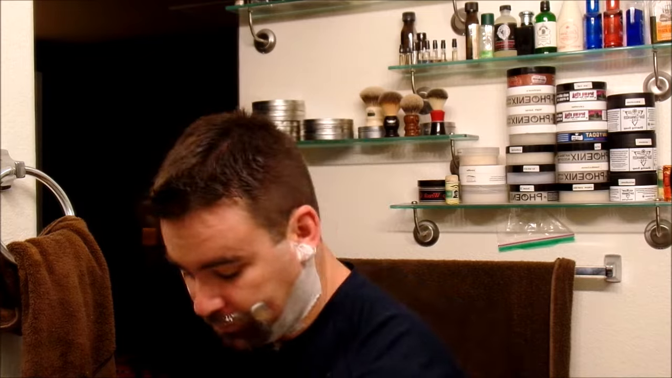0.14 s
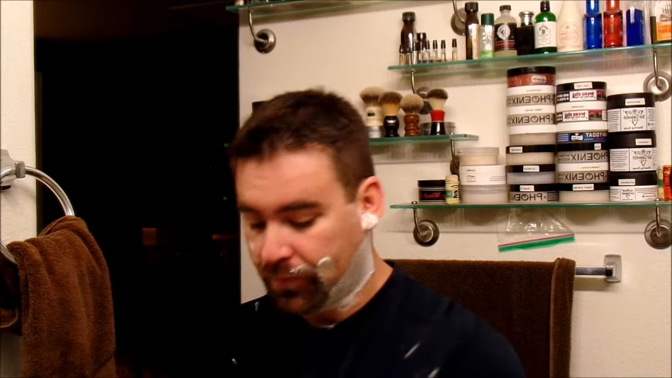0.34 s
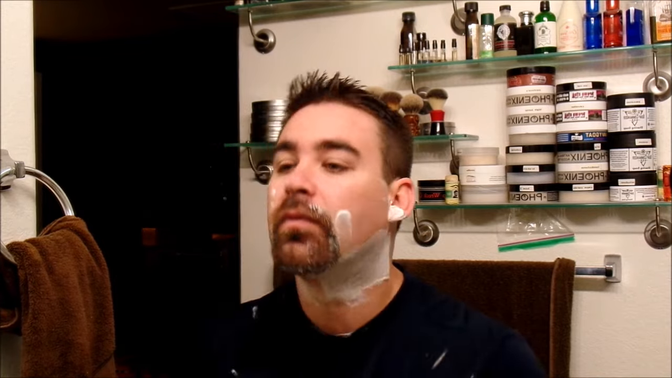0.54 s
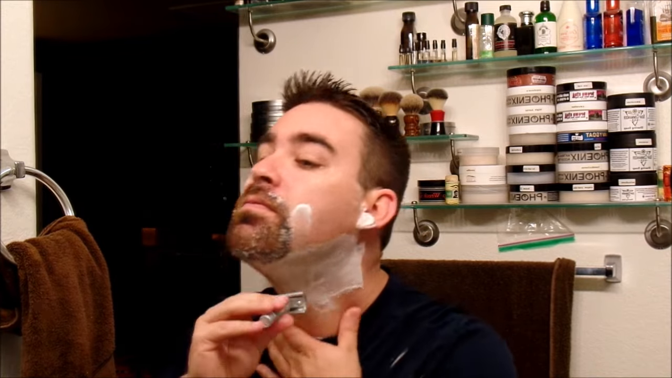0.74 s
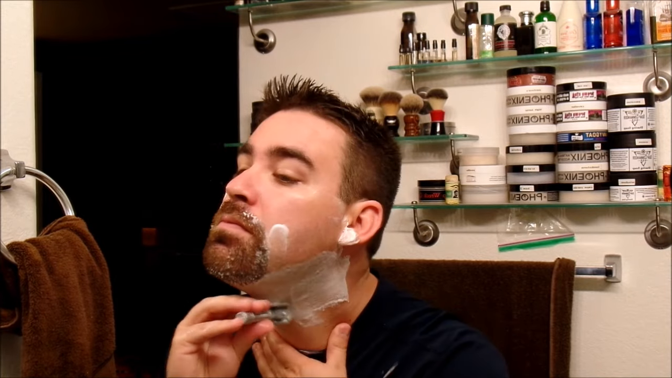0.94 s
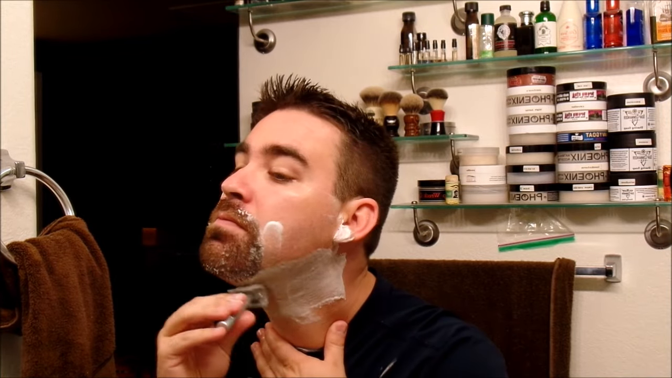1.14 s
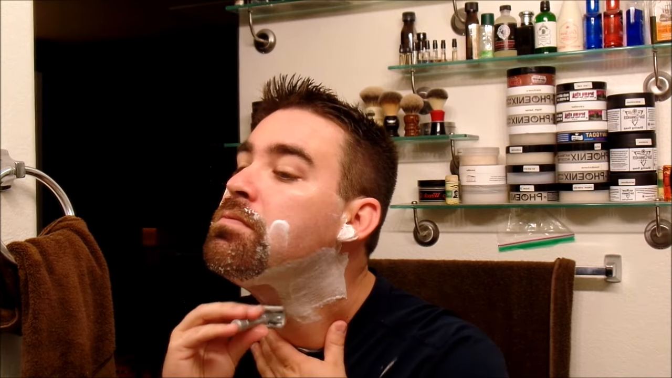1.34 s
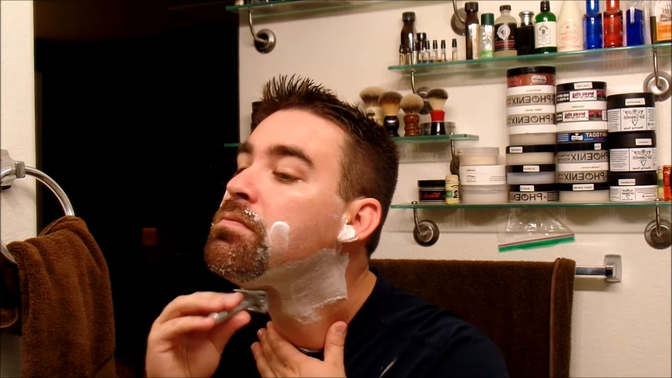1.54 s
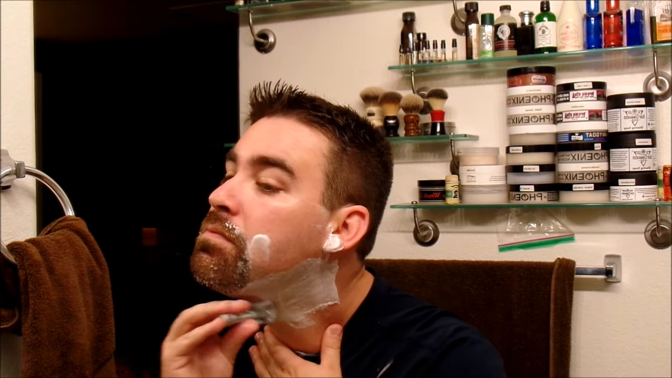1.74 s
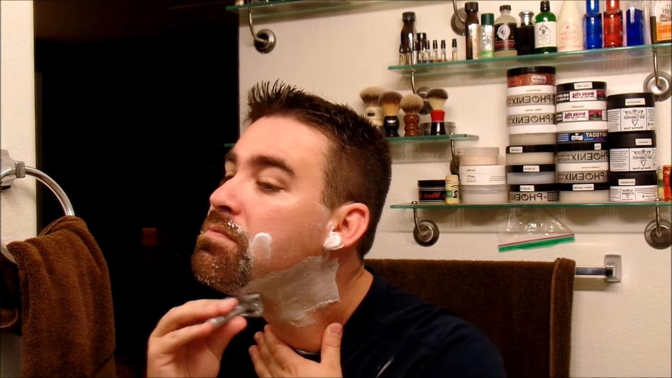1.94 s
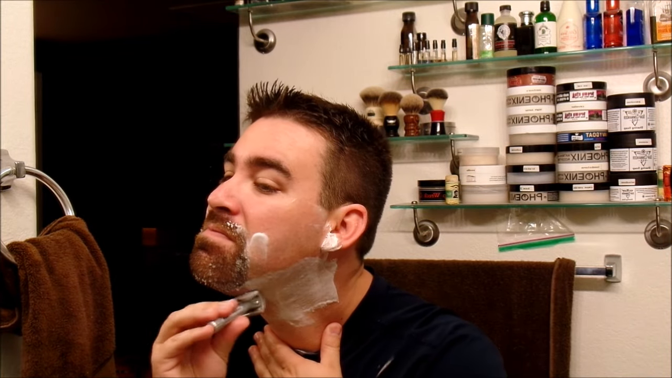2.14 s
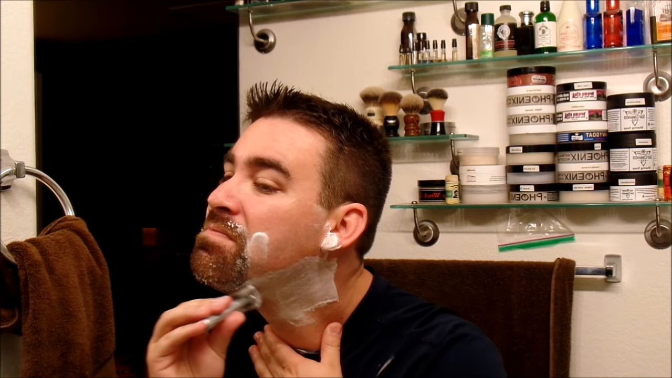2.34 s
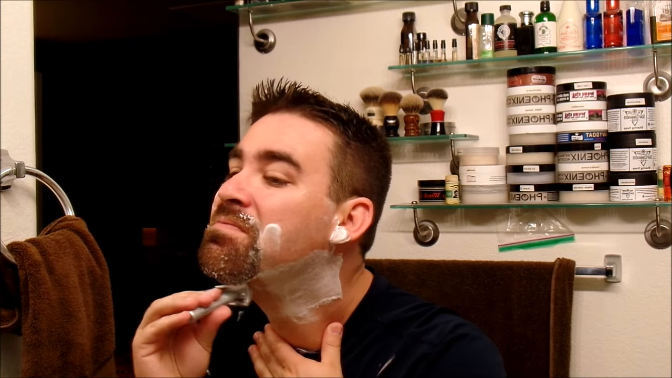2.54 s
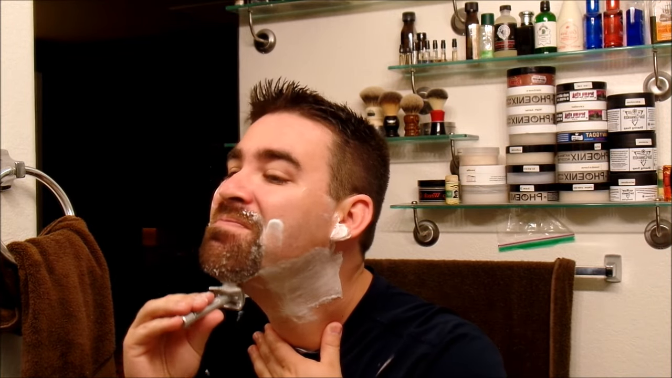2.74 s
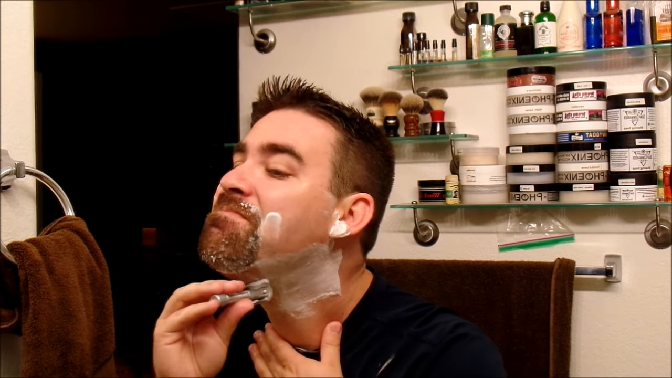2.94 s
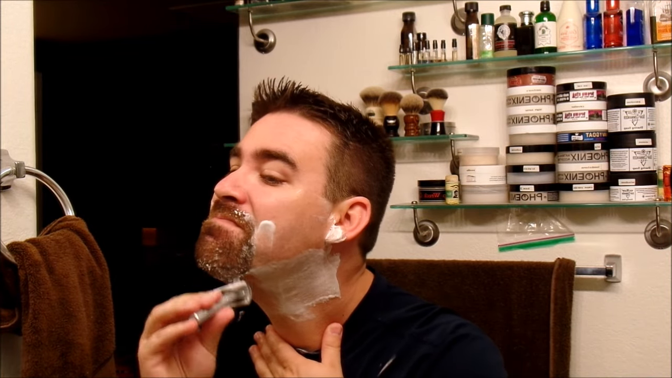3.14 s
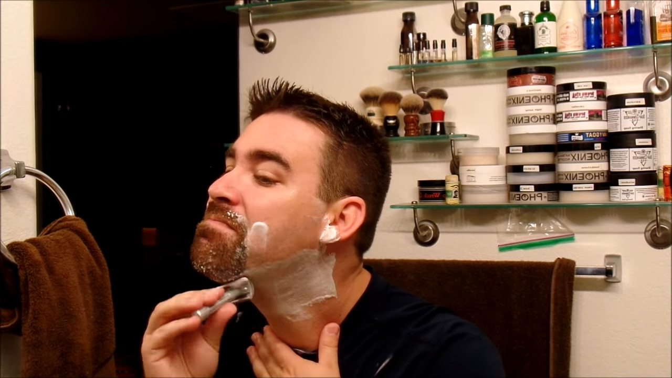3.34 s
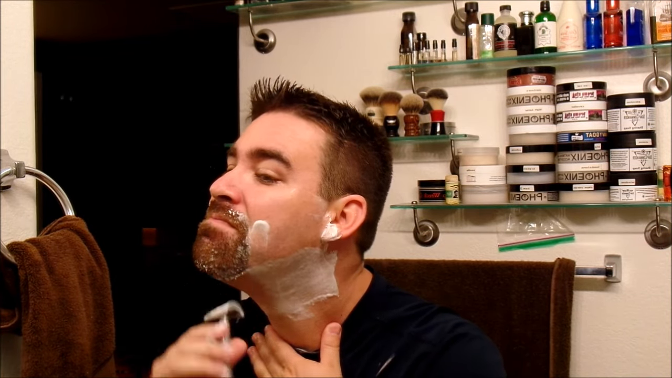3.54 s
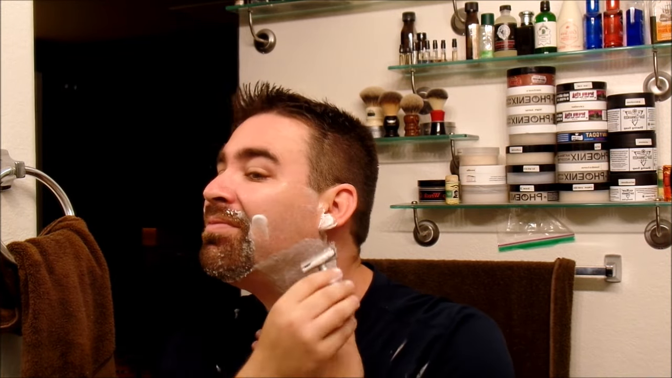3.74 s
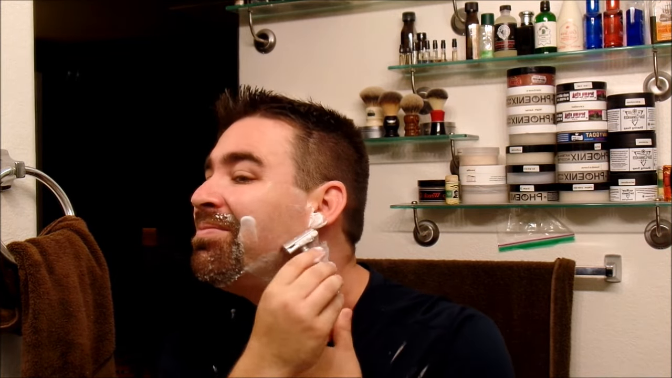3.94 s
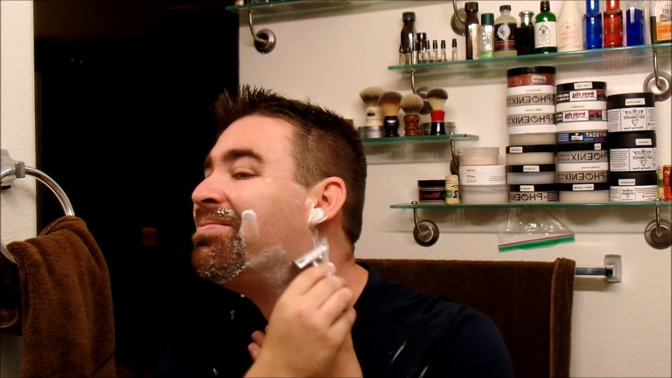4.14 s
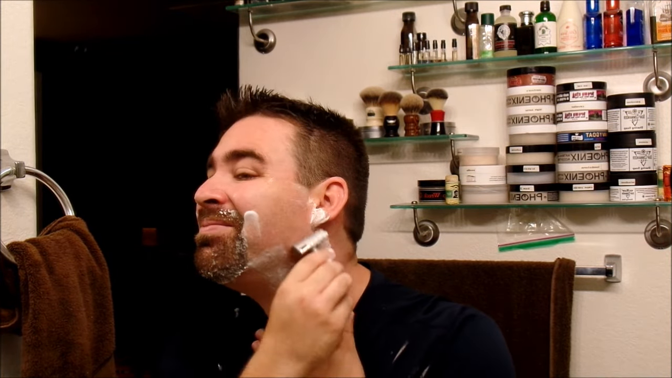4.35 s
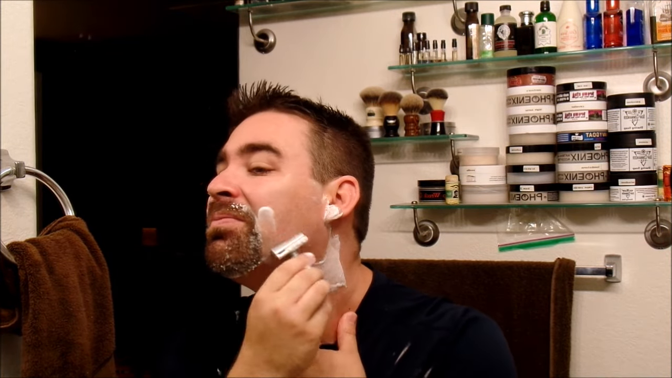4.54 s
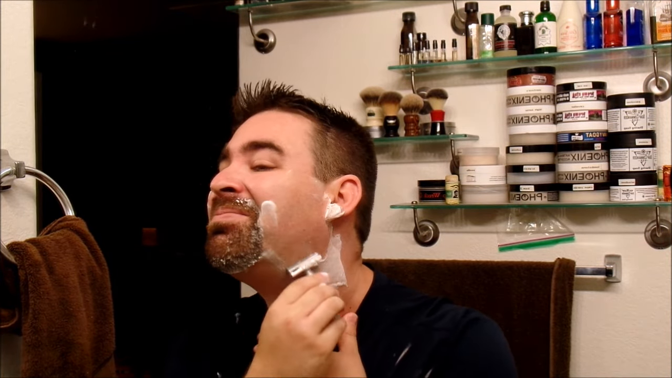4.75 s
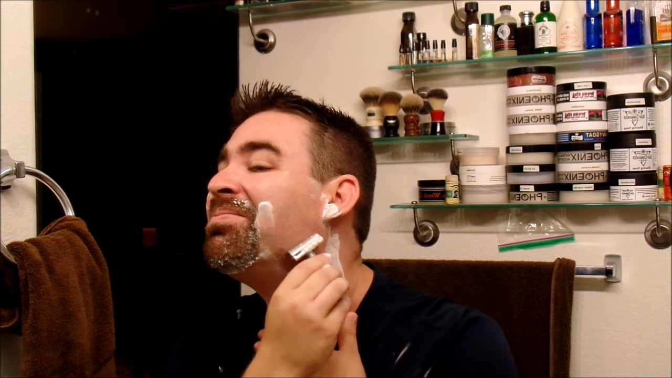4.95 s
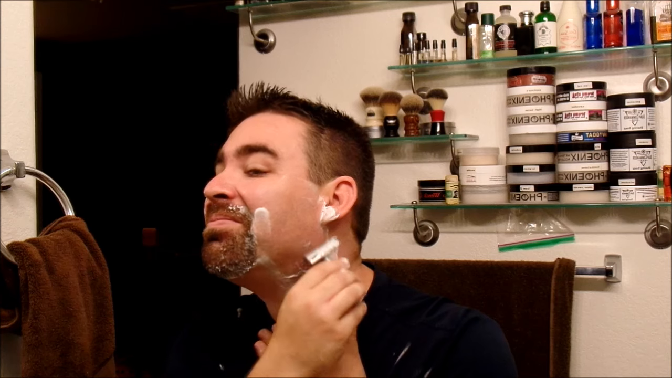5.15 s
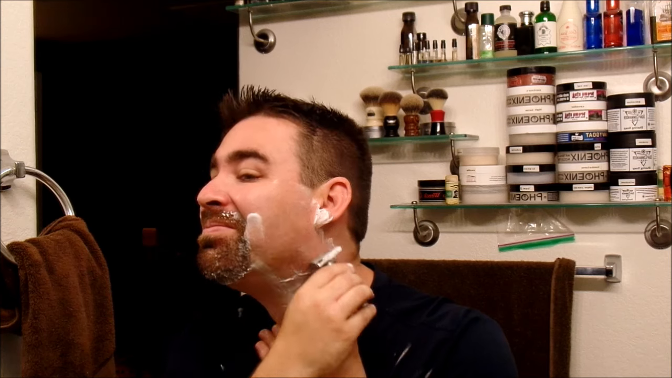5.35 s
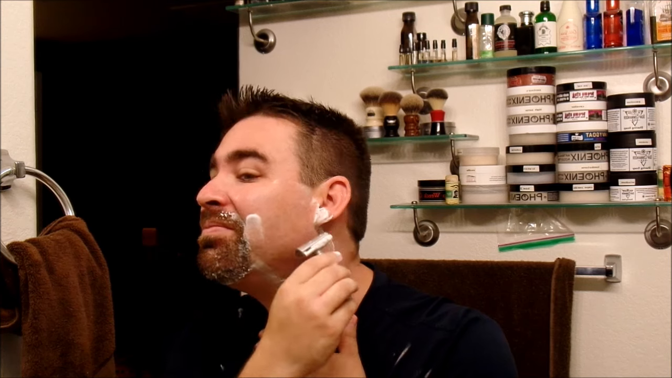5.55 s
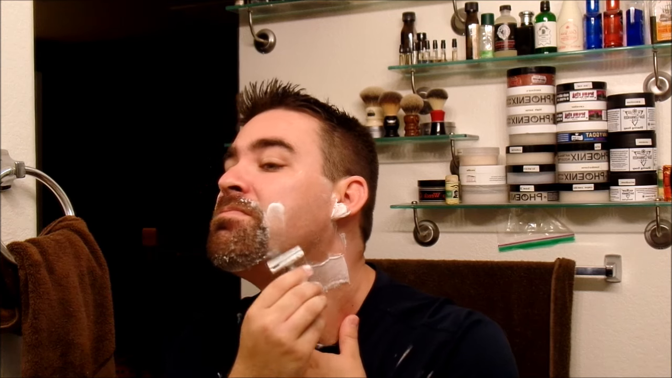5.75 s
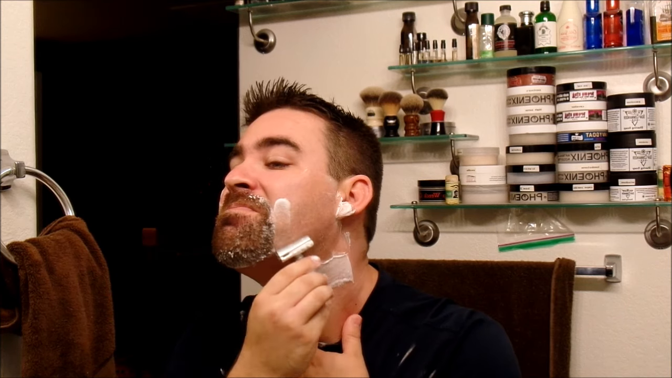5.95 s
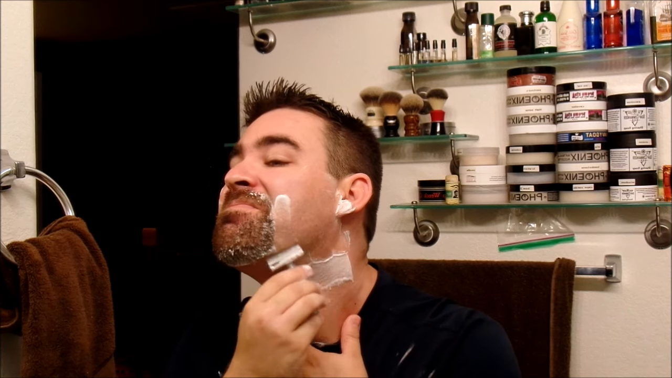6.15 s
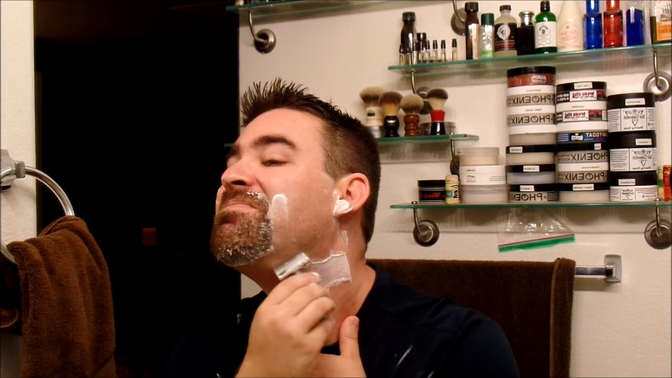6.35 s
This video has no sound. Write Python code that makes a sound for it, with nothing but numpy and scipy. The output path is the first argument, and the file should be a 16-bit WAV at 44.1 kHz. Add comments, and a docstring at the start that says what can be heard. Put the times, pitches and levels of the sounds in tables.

```python
"""A steel safety razor scrapes lathered stubble in short quick strokes: snaps at the blade, rubbing at the guard.
Place: a small bathroom with near, hard walls. Before the strokes the razor is knocked once on the basin, and
scuffs, a tap and clicks follow as it is handled: shaped noise and dying modes. A fan of coloured noise and
wavering tones runs behind. The recorder's expander turns the room down between strokes, so that the hum
swells with each one."""
import sys
import numpy as np
from scipy import signal
from scipy.fft import rfft
from scipy.io import wavfile
from scipy.ndimage import uniform_filter1d

SR = 44100
rng = np.random.default_rng(int(sys.argv[2]) if len(sys.argv) > 2 else 0)


def waveform_to_disk(signal):
    """Save audio, clipped to [-1, 1], as 16-bit WAV at the path in sys.argv[1]."""
    frames = np.transpose(np.atleast_2d(signal))
    scaled = np.clip(frames, -1, 1) * 32767
    samples = np.round(scaled).astype(np.int16)
    wavfile.write(sys.argv[1], SR, samples)


N = 282225
TIME = np.arange(N) / SR   # s

# All levels in the tables are relative: each source adds its own gain.
# razor strokes: fastest motion t/s, length between half-height points/s, blade rasp level/dB
RAZOR_STROKES = [(.586, 0.029, -51.5), (1.095, 0.047, -62.5), (1.225, 0.024, -56.5), (1.354, .035, -59),
                 (1.57, .05, -63.5), (1.877, .034, -53.5), (1.996, .036, -50), (2.102, .032, -48.5),
                 (2.189, .036, -48.5), (2.286, 0.034, -49.5), (2.381, 0.026, -45.5), (2.46, 0.027, -50.5),
                 (2.61, .039, -50.5), (2.722, .026, -47.5), (2.811, 0.017, -51.5), (3.084, 0.05, -50),
                 (3.204, 0.035, -53), (3.421, .037, -53.5), (3.549, 0.046, -51), (4.121, 0.033, -53.5),
                 (4.253, 0.038, -51.5), (4.369, 0.024, -49.5), (4.477, 0.036, -51.5), (4.731, .036, -50),
                 (4.857, 0.034, -48.5), (4.963, 0.041, -56.5), (5.094, 0.042, -47), (5.204, .037, -48.5),
                 (5.335, 0.034, -53.5), (5.436, .02, -56.5), (5.554, 0.04, -56.5), (6.095, 0.083, -59),
                 (6.198, .033, -57.5), (6.302, .036, -61)]
# whiskers snapping at the blade: f/Hz, spectrum level/dB
WHISKER_COLOUR = [(1000, -22), (2500, -5.5), (4000, -11), (6300, -8), (8000, -4.5), (9500, -6),
                  (11000, 1.5), (13000, -9.5), (15800, -3)]
# resonances of the razor head under the blade: f/Hz, width/Hz, level/dB
HEAD_RESONANCES = [(8470, 430, 0), (9260, 320, -1.5), (10040, 350, -4.5), (10700, 260, -13),
                   (12550, 490, 5), (14100, 450, 3.5), (15700, 600, -1)]
# guard rubbing on skin: f/Hz, spectrum level/dB
SKIN_COLOUR = [(40, -7), (120, -16), (220, -1), (600, 2.5), (1100, 3.5), (2000, -7.5), (4000, -8.5),
               (8000, -18), (16000, -36)]
# rub of the guard as the razor works its way over the neck: t/s, level/dB
SKIN_RUB_LEVEL = [(.586, -59), (1.098, -53.5), (2.1, -55), (2.46, -64), (3.085, -57), (3.3, -62),
                  (4.123, -52), (4.368, -50.5), (4.733, -60.5), (5.095, -49.5), (6.095, -64), (6.302, -58)]
# early reflections from mirror and shelves, paths about 0.7 to 2 m longer: delay/s, level/dB
NEAR_REFLECTIONS = [(.0021, -8), (.0037, -15), (.0058, -17)]
# wet scuffs while the razor is handled: t/s, length/s, level/dB, centre of the hiss f/Hz
WET_SCUFFS = [(0.171, .007, -48.5, 11100), (.181, 0.0057, -32.5, 8950), (0.191, .014, -36, 9500),
              (0.199, 0.022, -44, 3780), (.255, .011, -52, 5500), (.297, 0.015, -45, 7340),
              (.321, .011, -53, 10500), (.338, 0.0095, -45, 8850)]
# fine spatter inside the scuffs: f/Hz, spectrum level/dB
SPATTER_COLOUR = [(300, 11.5), (1500, -10.0), (3500, -4.5), (16000, -0.5)]
# clicks of the razor in the fingers: t/s, thin top level/dB, dull body level/dB
FINGER_CLICKS = [(0.458, -37.5, -60), (0.471, -47, -41.5), (0.4917, -41, -60), (0.7121, -41, -50),
                 (0.726, -39.5, -52), (0.825, -39, -49), (0.9643, -42, -63)]
# thin top and dull body of a click: f/Hz, spectrum level/dB
CLICK_TOP_COLOUR = [(3000, -19), (10000, -4.5), (13500, -2), (15500, -7)]
CLICK_BODY_COLOUR = [(800, -15), (2500, 8), (7000, 4), (11000, -26)]
# light tap on the counter: t/s, level/dB
COUNTER_TAP = [(0.349, -36.5)]
# ringing of the tap: f/Hz, level/dB, t60/s
COUNTER_TAP_MODES = [(1040, -20, 0.057), (2020, -13, .08), (2230, 4.5, 0.045), (2650, -20, 0.048),
                     (7537, -18, .06)]
# contact noise of the tap: f/Hz, spectrum level/dB
COUNTER_TAP_COLOUR = [(200, -22), (600, -10), (1400, -7), (2000, -1), (2350, 1), (3200, -11), (5000, -13.5),
                      (8000, -14), (15000, -24.5)]
# knock on the basin: t/s, level/dB
BASIN_KNOCK = [(0.0059, -0.5)]
# what the basin rings with: f/Hz, level/dB, t60/s
BASIN_MODES = [(250, -41.5, .12), (360, -36.5, 0.21), (501.8, -30.5, .14), (778.5, -18.5, .11),
               (831, -15, 0.071), (863, -20.5, .12), (1017, -27, .12), (1263, -20.5, .1), (1470, -22, .12),
               (1796, -24.5, 0.14), (2138, -12, 0.064), (2258, -11.5, .06), (2415, -14, 0.038),
               (2740, -20.5, 0.075), (2900, -21.5, .08), (3100, -16.5, 0.055), (3410, -20, 0.092),
               (3800, -20, .09), (4100, -18.5, 0.064), (4780, -19.5, 0.019), (5690, -7.5, 0.044),
               (6040, -20, .07)]
# long, thin ring of the steel razor: f/Hz, level/dB, t60/s
STEEL_MODES = [(5720, -22, .14), (8519, -22.5, .1), (9828, -21, .085), (15450, -35, .075)]
# contact of the knock and its early reflections: f/Hz, spectrum level/dB
BASIN_CONTACT_COLOUR = [(100, -31), (300, -26), (600, -9), (820, -2), (1300, -7), (1900, -6.5), (2300, -4),
                        (3500, -5), (4400, -12), (5770, -5.5), (7290, -18.5), (9600, -14), (11000, -37.5),
                        (16000, -31.5)]
# air noise of the fan: f/Hz, spectrum level/dB
FAN_AIR_COLOUR = [(25, -14.5), (70, -15), (125, -16.5), (170, -8.5), (300, -9), (470, -9.5), (600, -1),
                  (1050, -5), (1400, -8), (2500, -11.5), (4200, -14.5), (5300, -12), (8000, -17.5),
                  (16000, -19)]
# hum of the fan: f/Hz, level/dB
FAN_HUM = [(360.2, -69), (720.4, -75), (857, -84.5), (1080.6, -77.5), (1297, -90), (6409, -87)]


def shaving(rasp_db=-1.5, rub_db=-8.0, head_db=-2.0, rub_lag_s=0.016, rub_stretch=2.0, rise_share=0.49):
    """The blade snaps whiskers while it moves fast; the guard rubs the skin a little later and for longer."""
    cutting = sum(from_db(db) * swell(s, length, rise_share) for s, length, db in RAZOR_STROKES)
    sliding_power = sum(swell(s + rub_lag_s, length * rub_stretch, rise_share) ** 2
                        for s, length, _ in RAZOR_STROKES)
    sliding = np.sqrt(sliding_power)

    clumps = from_db(1.0 * drift(300))   # whiskers stand in clumps: 1 dB spread
    snaps = grains(per_s=7100, spread_db=3.0) * clumps
    head = rms_one(sum(from_db(db) * resonance(snaps, hz, width) for hz, width, db in HEAD_RESONANCES))
    whiskers = mirrored(coloured(snaps, WHISKER_COLOUR) + from_db(head_db) * head)

    skin = mirrored(coloured(grains(per_s=4000, spread_db=3.5), SKIN_COLOUR))
    neck_db = np.interp(TIME, *np.transpose(SKIN_RUB_LEVEL))
    return from_db(rasp_db) * cutting * whiskers + from_db(rub_db + neck_db) * sliding * skin


def mirrored(x):
    """Near, hard surfaces comb the sound the same way on every stroke; rms 1."""
    reflections = sum(from_db(db) * np.roll(x, int(s * SR)) for s, db in NEAR_REFLECTIONS)
    return rms_one(x + reflections)


def scuffs(level_db=-0.5, rise_share=0.36, width_share=0.48):
    """Short wet hisses of fine spatter, each in its own band, as wide as a share of its centre frequency."""
    spatter = coloured(grains(per_s=10000, spread_db=4.0), SPATTER_COLOUR)
    out = np.zeros(N)
    for s, length, db, hz in WET_SCUFFS:
        hiss = rms_one(resonance(spatter, hz, width_share * hz))
        out += from_db(level_db + db) * swell(s, length, rise_share) * hiss
    return out


def ticks(bright_db=-3.0, dull_db=0.5, t60_s=0.0067):
    """Very short metal clicks, each dying noise with a thin top and a duller body."""
    bright = noise(CLICK_TOP_COLOUR)
    dull = noise(CLICK_BODY_COLOUR)
    out = np.zeros(N)
    for s, top_db, body_db in FINGER_CLICKS:
        click = from_db(top_db + bright_db) * bright + from_db(body_db + dull_db) * dull
        out += dying(s, t60_s) * click
    return out


def tap(contact_t60_s=0.07):
    """A light blow: contact noise dies away over a short clink of ringing modes."""
    s, db = COUNTER_TAP[0]
    contact = dying(s, contact_t60_s) * noise(COUNTER_TAP_COLOUR)
    return from_db(db) * (ringing(s, COUNTER_TAP_MODES) + contact)


def knock(crack_db=-7.5, crack_t60_s=0.0057, scatter_db=-14.5, scatter_t60_s=0.098,
          ring_db=-3.5, razor_db=-0.5, low_hz=200):
    """Steel on the basin: a hard crack, its scatter in the bowl, and the ringing of both bodies."""
    s, db = BASIN_KNOCK[0]
    crack = from_db(crack_db) * dying(s, crack_t60_s)
    scatter = from_db(scatter_db) * dying(s, scatter_t60_s)
    contact = noise(BASIN_CONTACT_COLOUR) * (crack + scatter)
    rings = from_db(ring_db) * ringing(s, BASIN_MODES) + from_db(razor_db) * ringing(s, STEEL_MODES)
    # the knock carries little bass
    bass_cut = signal.butter(3, low_hz, "high", fs=SR, output="sos")
    return signal.sosfilt(bass_cut, from_db(db) * (contact + rings))


def fan(air_db=-56.5, hum_gain_db=9.0, waver_db=3.0):
    """Moving air makes steady noise; the motor hums in tones that each waver in level."""
    hum = np.zeros(N)
    for hz, db in FAN_HUM:
        tone = np.sin(2 * np.pi * (hz * TIME + rng.random()))
        hum += from_db(db + waver_db * drift(22)) * tone
    return from_db(air_db) * noise(FAN_AIR_COLOUR) + from_db(hum_gain_db) * hum


def bathroom(x, wet_db, wall_hz, t60_s=0.24):
    """Add the dense, slightly dull reflections of close walls: decaying noise, low-passed."""
    t = TIME[:SR // 2]
    tail = rng.standard_normal(len(t)) * from_db(-60 * t / t60_s) * (t > .004)
    tail = signal.sosfilt(signal.butter(1, wall_hz, fs=SR, output="sos"), tail)
    tail /= np.linalg.norm(tail)
    return x + from_db(wet_db) * signal.fftconvolve(x, tail)[:N]


def from_db(db):
    """Decibels to gain."""
    return 10 ** (np.asarray(db) / 20)


def rms_one(x):
    """Scale to an rms of 1."""
    return x / np.sqrt(np.mean(x ** 2) + 1e-20)


def coloured(x, spectrum):
    """Filter a signal by a spectrum, interpolated over log frequency; rms 1."""
    hz, level_db = np.transpose(spectrum)
    bins_hz = np.maximum(np.fft.rfftfreq(N, 1 / SR), 1)
    gain = from_db(np.interp(np.log(bins_hz), np.log(hz), level_db))
    return rms_one(np.fft.irfft(rfft(x) * gain, N))


def noise(spectrum):
    """Steady noise of a given colour; rms 1."""
    return coloured(rng.standard_normal(N), spectrum)


def drift(rate_hz):
    """Random values joined by straight lines; rms 1."""
    knots = np.arange(0, N / SR + 1, 1 / rate_hz)
    return rms_one(np.interp(TIME, knots, rng.standard_normal(len(knots))))


def grains(per_s, spread_db):
    """Random tiny snaps of uneven size and either sign."""
    excess_db = spread_db * np.minimum(rng.exponential(1, N), 4)
    sizes = from_db(excess_db) * rng.choice([-1, 1], N)
    return sizes * (rng.random(N) < per_s / SR)


def resonance(x, hz, width_hz):
    """A band resonance with gain 1 at its centre."""
    b, a = signal.iirpeak(hz, hz / width_hz, fs=SR)
    return signal.lfilter(b, a, x)


def swell(s, length, rise_share):
    """A bell of height 1 at s; length spans its half-height points, rise_share is the part before the peak."""
    out = np.zeros(N)
    near = slice(*np.searchsorted(TIME, [s - 4 * length, s + 4 * length]))
    t = TIME[near] - s
    half_width = length * np.where(t < 0, rise_share, 1 - rise_share)
    out[near] = .5 ** ((t / half_width) ** 2)
    return out


def dying(s, t60):
    """An envelope that jumps to 1 at s and falls 60 dB in t60 seconds."""
    return (TIME >= s) * np.exp(-np.log(1000) * np.clip((TIME - s) / t60, 0, 10))


def ringing(s, modes):
    """Modes set ringing at s with alternating sign; all have died within a second."""
    t = np.maximum(TIME[:int((s + 1) * SR)] - s, 0)
    rings = np.zeros(len(t))
    for k, (hz, db, t60) in enumerate(modes):
        rings += (-1) ** k * from_db(db - 60 * t / t60) * np.sin(2 * np.pi * hz * t)
    return np.pad(rings, (0, N - len(t)))


def scene():
    """Razor sounds with the room around them, over the fan, in one microphone channel."""
    strokes = bathroom(shaving(), wet_db=-10.0, wall_hz=6950)
    handling = bathroom(tap() + scuffs() + ticks(), wet_db=-13.5, wall_hz=7000)
    basin = bathroom(knock(), wet_db=-28.5, wall_hz=2500)
    return (strokes + handling + basin + fan())[None, :]


def expander(x, open_db=-52.0, slope=1.67, depth_db=6.0, release_db_per_s=75.5, window_s=.014, sense_hz=600):
    """Sound below the threshold is turned down; the gain opens fast and sinks back at a steady rate."""
    sensed = signal.sosfilt(signal.butter(2, sense_hz, "high", fs=SR, output="sos"), x)
    power = uniform_filter1d(sensed ** 2, int(window_s * SR))
    level_db = 10 * np.log10(np.maximum(power, 1e-14))
    gain_db = np.clip(slope * (level_db - open_db), -depth_db, 0)
    # a running maximum on a rising ramp makes the gain fall no faster than the release
    ramp_db = release_db_per_s * TIME
    held_db = np.maximum.accumulate(gain_db + ramp_db, axis=-1) - ramp_db
    return x * from_db(uniform_filter1d(held_db, size=600))   # smoothed over about 14 ms


def record(dry, cutoff_hz=15750):
    """The recorder: expander, full-scale clipping, and a steep cut of the top."""
    limited = np.clip(expander(dry), -1, 1)
    return signal.sosfilt(signal.ellip(12, .2, 80, cutoff_hz, fs=SR, output="sos"), limited)


dry = scene()
out = record(dry)
waveform_to_disk(out)
```